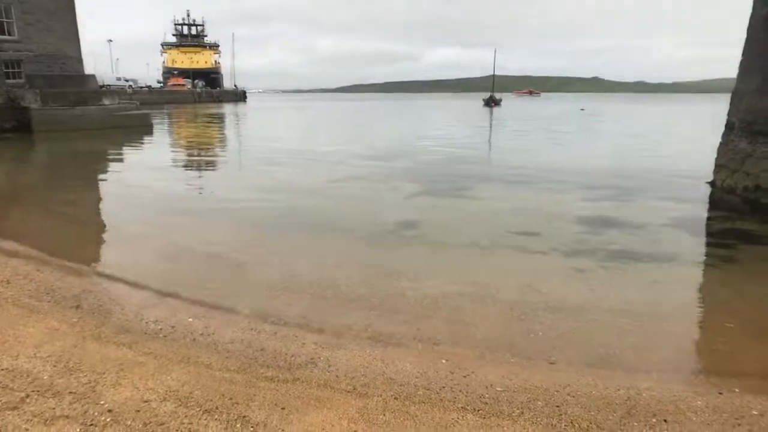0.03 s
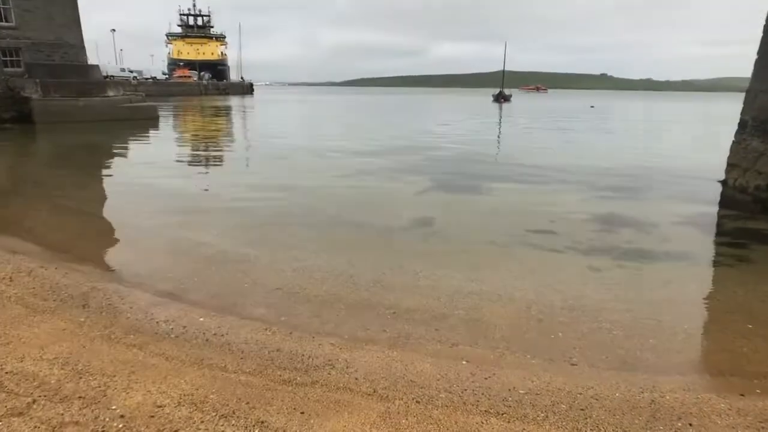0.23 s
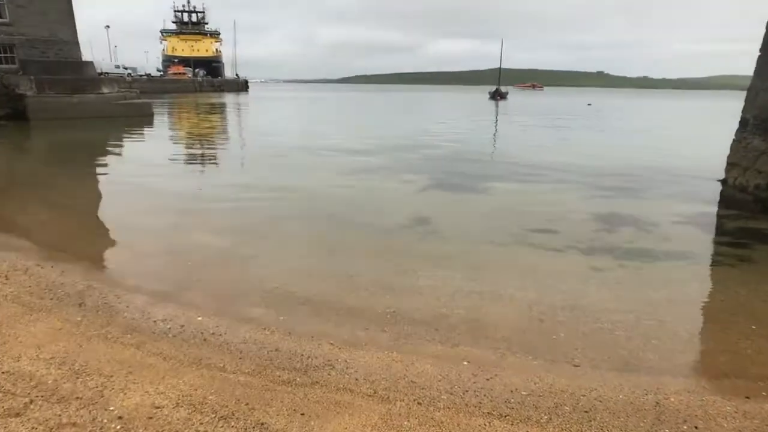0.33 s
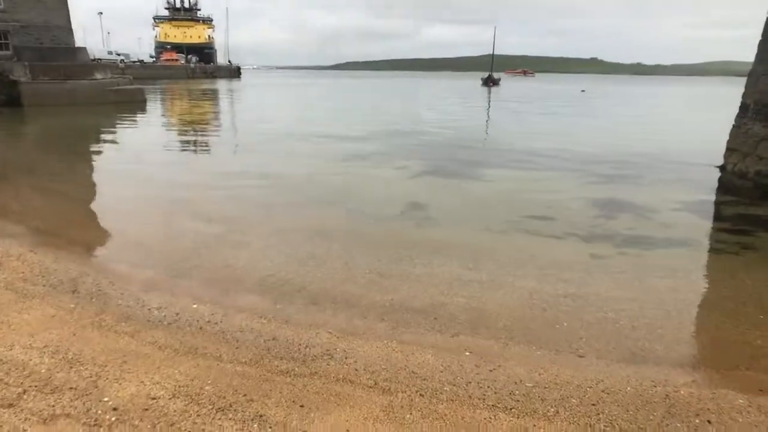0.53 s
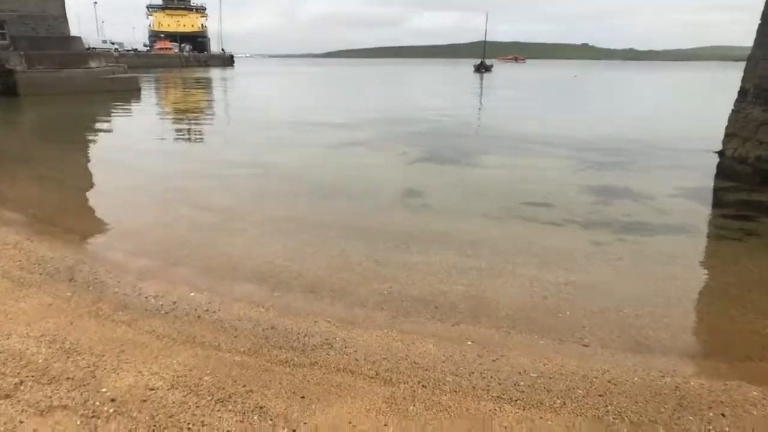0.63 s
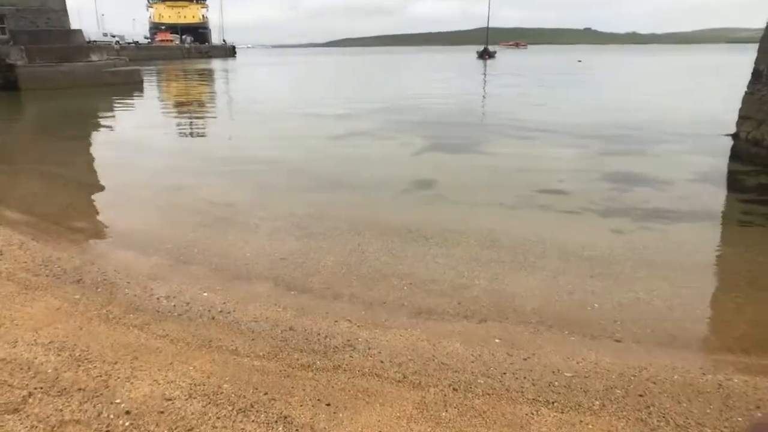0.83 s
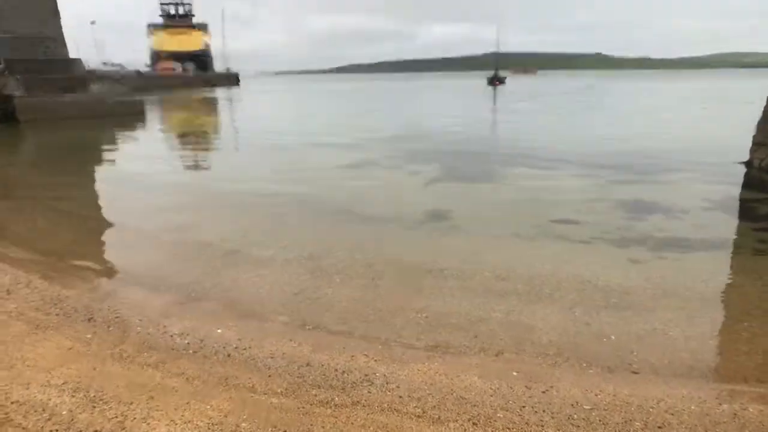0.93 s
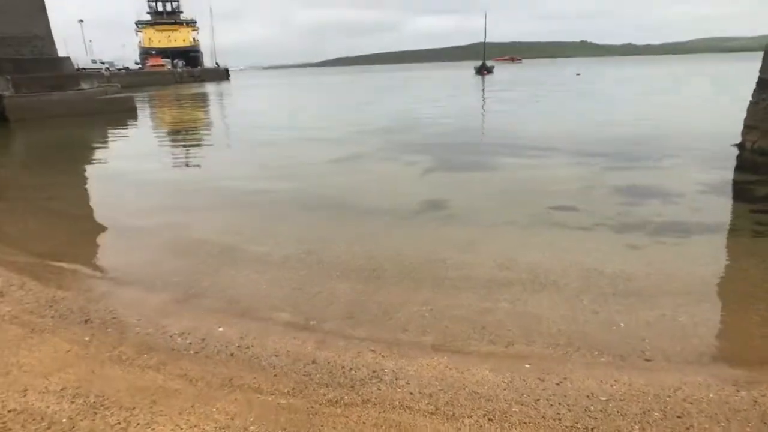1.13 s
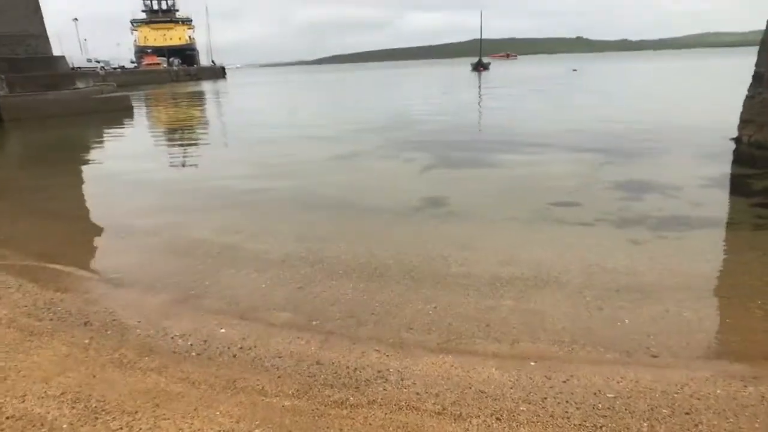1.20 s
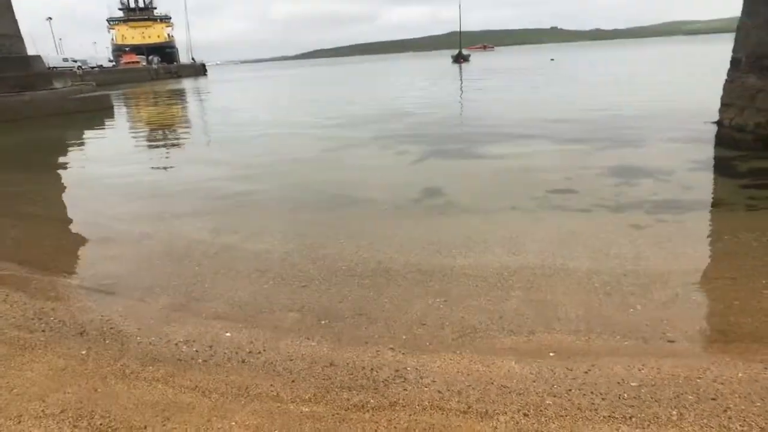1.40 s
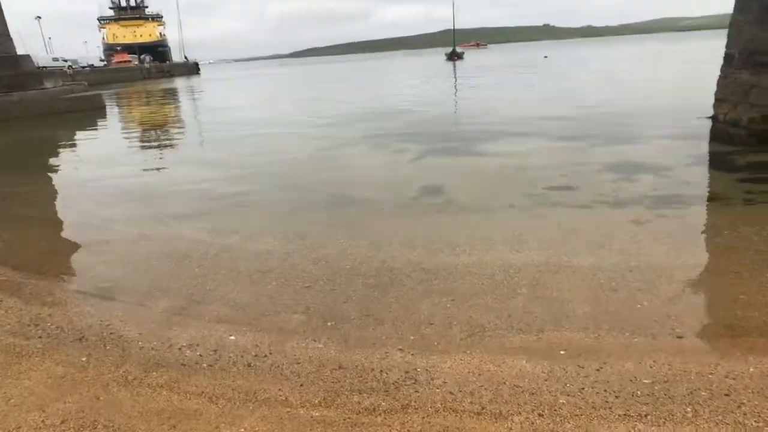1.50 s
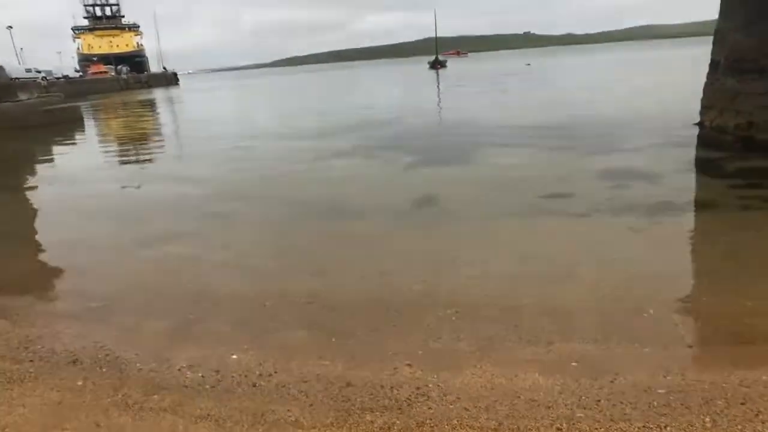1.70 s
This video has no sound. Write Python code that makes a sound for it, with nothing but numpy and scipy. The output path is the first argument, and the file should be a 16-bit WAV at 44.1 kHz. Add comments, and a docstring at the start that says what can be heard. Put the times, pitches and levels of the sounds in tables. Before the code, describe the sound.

Close handling noise on a microphone: irregular ticks and dull thumps, one loud knock, then a sharp click and a few lighter taps. Further off, water laps softly on a calm harbour beach under a faint, wavering engine-like hum.

```python
"""Fingers knock on the body of a hand-held microphone: each knock is a tick that drops into a thump.
One hard click, with a thin hiss swelling around it, leaves the casing ringing briefly; a hollow bump
of the hand follows. Behind lies a calm harbour beach: grit ticks, and a wavelet washes over coarse
sand and drains away, over open air and a low, wavering drone like a distant boat engine."""
import sys
import numpy as np
from scipy import signal
from scipy.fft import rfft, irfft
from scipy.io import wavfile

SR = 44100
rng = np.random.default_rng(int(sys.argv[2]) if len(sys.argv) > 2 else 0)


def file_out(sig):
    """Save sig as 16-bit WAV at sys.argv[1]."""
    # one column per channel
    cols = np.atleast_2d(sig).T
    # limit, then scale
    lim = np.clip(cols, -1, 1)
    pcm = np.round(lim * 32767).astype(np.int16)
    wavfile.write(sys.argv[1], SR, pcm)


N = 77175
TIME = np.arange(N) / SR

# Finger hits on the casing: (time [s], thump level [dB], sweep top [Hz], sweep bottom [Hz],
# tick level [dB], polarity [1 press, -1 release])
KNOCK_HITS = [(0.017, -35.5, 242, 68.4, -27, 1), (0.1755, -24.5, 407, 87, -25, 1),
              (0.2033, -23.5, 213, 82, -37, 1), (0.2279, -23, 336, 81.6, -46, 1),
              (0.2316, -25.5, 335, 83.4, -27, 1), (0.3183, -26.5, 333, 80, -41, 1),
              (0.4287, -22.5, 390, 93, -27, 1), (0.5731, -5, 2750, 162, -9, 1),
              (0.6665, -31.5, 800, 150, -25.5, 1), (0.7515, -12, 2380, 298, -18.5, 1),
              (0.7550, -15, 190, 91, -58, 1), (0.7884, -23.5, 1420, 303, -22, -1),
              (0.8950, -16.5, 656, 157, -59, -1), (0.9465, -15, 140, 96, -52, 1),
              (0.9798, -18, 263, 104, -38, -1), (1.0017, -10.5, 111, 102, -34, -1),
              (1.016, -20, 116, 69, -42, -1), (1.3498, -32.5, 900, 208, -28.5, -1),
              (1.3560, -27, 198, 78, -44, 1), (1.4652, -37.5, 710, 203, -39.5, 1)]
# The tick on each attack: (frequency [Hz], level [dB], 60 dB decay time [s])
TICK_MODES = [(1118, -1, 0.0037), (2220, 1.5, 0.0024), (3720, -0.5, 0.0022), (4720, -4.5, 0.00095),
              (9300, -30, 0.00076)]
# Tone of the scuff behind each tick: (frequency [Hz], level [dB])
SCUFF_EQ = [(400, 6), (1200, 10), (3800, -10.5), (5500, -25), (11000, -14.5), (16000, -25)]
def knocks():
    """Fingers tick, scuff and thump. The thump sweeps downward; a soft contact loses its top end."""
    sweep_cycles, first_crest_s = 0.848, 0.000434
    top_slope, bottom_slope = 4.96, 5.06
    scuff_vs_tick_db, scuff_decay_s = -13.5, 0.0044
    hits, scuff_envelope = np.zeros(N), np.zeros(N)
    for start, thump_db, top_hz, bottom_hz, tick_db, polarity in KNOCK_HITS:
        t = age(start) + 1e-7
        hz = sweep_cycles / t  # highs arrive first, lows last
        high_cut = 1 + (hz / top_hz) ** top_slope
        low_cut = 1 + (bottom_hz / hz) ** bottom_slope
        envelope = (hz < SR / 2) / np.sqrt(high_cut * low_cut)
        phase = 2 * np.pi * sweep_cycles * np.log(t / first_crest_s)
        thump = from_db(thump_db) * envelope * np.cos(phase)
        tick = from_db(tick_db) * struck(TICK_MODES, start)
        hits += polarity * (thump + tick)
        scuff_envelope += from_db(tick_db + scuff_vs_tick_db) * burst(start, scuff_decay_s)
    return hits + scuff_envelope * noise(SCUFF_EQ)


# The click's dry snap: (frequency [Hz], level [dB], 60 dB decay time [s])
SNAP_MODES = [(2280, 1, 0.0045), (3810, 0.5, .0018), (8600, -8, 0.0011), (12500, -15, 0.0039)]
# The casing's ringing tail: (frequency [Hz], level [dB], 60 dB decay time [s])
CASING_MODES = [(2194, 1, 0.17), (2295, -25, .15), (2740, -7, .17), (2700, 1, 0.16), (3100, 4, 0.18),
                (3180, -6, .19), (3450, -7, .21), (3500, -31, .16), (3694, 0, .25), (4000, -10, 0.14),
                (4470, -14, .2), (4270, -17, .17), (12330, 7.5, 0.044)]
# Tone of the casing's rattle: (frequency [Hz], level [dB])
RATTLE_EQ = [(500, 1), (1300, -7), (2300, -0.5), (4200, 2.5), (5500, -15), (9000, -15), (16000, -39)]
def hard_click():
    """A sharp snap, then the casing rings and rattles out."""
    start_s, rattle_attack_s, rattle_decay_s = 0.9796, 0.0067, 0.031
    snap = from_db(-9) * struck(SNAP_MODES, start_s)
    ring = from_db(-42) * struck(CASING_MODES, start_s)
    t = age(start_s)
    envelope = (1 - np.exp(-t / rattle_attack_s)) * np.exp(-t / rattle_decay_s)
    rattle = from_db(-30) * envelope * rub_gate() * noise(RATTLE_EQ)
    return snap + ring + rattle


def hand_bump(peak_s=1.013, width_s=0.0076, hz=126):
    """The hand bumps the casing after the click: a few cycles of a hollow low note."""
    return from_db(-14.5) * bell_curve(peak_s, width_s) * np.sin(-2 * np.pi * hz * (TIME - peak_s))


def thin_hiss(centre_hz=12450, width_hz=2700, peak_s=1, rise_s=0.047, fall_s=0.037):
    """A narrow band of high noise swells around the click and fades."""
    radius = np.exp(-np.pi * width_hz / SR)
    resonance = [1, -2 * radius * np.cos(2 * np.pi * centre_hz / SR), radius ** 2]
    hiss = signal.lfilter([1, 0, -1], resonance, rng.standard_normal(N))
    swell = np.exp(-np.maximum(peak_s - TIME, 0) / rise_s - age(peak_s) / fall_s)
    return from_db(-46.5) * swell * rub_gate() * rms_one(hiss)


# Ticks of grit: (time [s], level before the filter [dB])
GRIT_HITS = [(0.02, -36), (0.843, -45), (0.873, -46.5), (.955, -44.5), (1.264, -49)]
def grit(decay_s=0.0021, band_hz=(1180, 4700)):
    """Single grains of grit tick faintly, each a tiny burst of noise."""
    envelope = sum(from_db(db) * burst(start, decay_s) for start, db in GRIT_HITS)
    band = signal.butter(2, band_hz, "band", fs=SR, output="sos")
    return 2 * signal.sosfilt(band, envelope * rng.standard_normal(N))


# Fader moves of the wash: (time [s], fizz level [dB], water level [dB], foam level [dB])
WASH_FADERS = [(0, -53, -45, -66), (.12, -45, -42, -74), (.3, -47, -43, -63.5), (.53, -44.5, -42.5, -63),
               (.62, -51.5, -45, -65.5), (.69, -44, -45, -61), (.79, -44, -34.5, -71),
               (.825, -53, -46, -88), (.92, -56.5, -45, -75), (1.10, -55, -50, -67),
               (1.18, -63.5, -52, -70), (1.33, -63, -59.5, -70), (1.42, -58, -55, -65),
               (1.57, -60.5, -49, -65.5), (1.65, -65.5, -69, -70), (1.75, -64.5, -56, -71)]
# Bright fizz of the sand: (frequency [Hz], level [dB])
FIZZ_EQ = [(1000, -12), (1900, 1.5), (3300, 5), (4400, -3), (5600, -15.5), (7500, -20.5), (9600, -14),
           (12000, -24), (16000, -27)]
# Soft body of the water: (frequency [Hz], level [dB])
WATER_EQ = [(30, 14), (60, 4.5), (120, 9.5), (240, 11), (400, -2.5), (700, 2), (1150, 1.5), (1600, -0.5),
            (2600, -20.5), (6000, -41)]
# Airy top of the foam: (frequency [Hz], level [dB])
FOAM_EQ = [(4000, -20), (6500, -5.5), (9300, 7), (11000, 2), (13000, 1), (16000, -4)]
def wash(flutter_db=1.33):
    """Water runs over the sand: a soft body, a fizz of shifting grains and the hiss of fine foam."""
    fizz_gain, water_gain, foam_gain = [
        from_db(db + flutter_db * drift(rate_hz=26)) for db in automation(WASH_FADERS)]
    fizz = rms_one(noise(FIZZ_EQ) + from_db(-9) * grains(FIZZ_EQ, per_s=2500, spread_db=6))
    water = noise(WATER_EQ)
    foam = grains(FOAM_EQ, per_s=14000, spread_db=2)
    return fizz_gain * fizz + water_gain * water + foam_gain * foam


# Midrange tone of the bubbles: (frequency [Hz], level [dB])
BUBBLE_EQ = [(500, -36), (850, -1.5), (1100, 4), (1450, -3), (2200, -29), (6000, -50)]
def lap(peak_s=0.442, width_s=0.056):
    """A soft swell of small bubbles as the wavelet turns over."""
    return from_db(-42.5) * bell_curve(peak_s, width_s) * grains(BUBBLE_EQ, per_s=1100, spread_db=2)


# Pitch and fader moves of the drone: (time [s], pitch [Hz], level [dB])
DRONE_MOVES = [(0, 65, -41), (.05, 65, -42), (.14, 67, -50), (.22, 70, -43), (.3, 72, -47), (.4, 76, -39),
               (.53, 74, -42), (.64, 73, -41), (.75, 73, -39), (.86, 71, -39), (.92, 70, -45),
               (1.05, 67, -36), (1.32, 65.6, -35.5), (1.41, 62, -49), (1.47, 61, -47), (1.53, 61.2, -39),
               (1.75, 61.2, -38)]
# Harmonics of the drone: (multiple of the pitch, level [dB])
DRONE_HARMONICS = [(1, -0.5), (2, -23), (3, -19.5), (4, -23.5)]
def drone(waver_db=0.5):
    """A low hum with weak overtones wavers in pitch and level, like a distant boat engine."""
    hz, db = automation(DRONE_MOVES)
    phase = 2 * np.pi * np.cumsum(hz) / SR
    tone = sum(from_db(harmonic_db) * np.sin(k * phase) for k, harmonic_db in DRONE_HARMONICS)
    return np.sqrt(2) * from_db(db + waver_db * drift(rate_hz=5.7)) * tone


# Dark tone of the open air: (frequency [Hz], level [dB])
AIR_EQ = [(30, -24), (60, 11), (110, 9), (220, 1.5), (400, -7), (1500, -11.5), (3500, -50), (5500, -38),
          (7500, -39), (9000, -28.5), (11000, -58), (16000, -72)]
def open_air():
    """A steady bed of low noise under the beach."""
    return from_db(-47) * noise(AIR_EQ)


def from_db(db):
    """Decibels to gain."""
    return 10 ** (np.asarray(db) / 20)


def rms_one(x):
    """Scale to unit rms."""
    return x / np.sqrt(np.mean(x ** 2) + 1e-20)


def automation(rows):
    """Join timed breakpoints with straight lines, one curve per value column."""
    times, *columns = np.transpose(rows)
    return [np.interp(TIME, times, column) for column in columns]


def age(start):
    """Seconds since a moment, zero before it."""
    return np.maximum(TIME - start, 0)


def burst(start, decay_s):
    """An envelope that jumps up and dies away."""
    return (TIME > start) * np.exp(-age(start) / decay_s)


def bell_curve(peak_s, width_s):
    """An envelope that swells and fades symmetrically."""
    return np.exp(-0.5 * ((TIME - peak_s) / width_s) ** 2)


def rub_gate(end_s=1.064, release_s=0.0021):
    """Open until the rubbing stops, cutting rattle and hiss together."""
    return np.exp(-age(end_s) / release_s)


def drift(rate_hz):
    """A smooth random wobble with a spread of about 1."""
    hop, settle = 40, 2000
    pole = np.exp(-2 * np.pi * hop * rate_hz / SR)
    white = rng.standard_normal(N // hop + settle + 2)
    slow = signal.lfilter([1], [1, -2 * pole, pole ** 2], white)[settle:]
    return np.interp(np.arange(N) / hop, np.arange(len(slow)), rms_one(slow))


def colour(x, eq):
    """Shape a steady sound with an EQ curve; rms 1."""
    hz, db = np.transpose(eq)
    bin_hz = np.maximum(np.fft.rfftfreq(N, 1 / SR), 1)
    gain = from_db(np.interp(np.log(bin_hz), np.log(hz), db))
    return rms_one(irfft(rfft(x) * gain, N))


def noise(eq):
    """Coloured noise; rms 1."""
    return colour(rng.standard_normal(N), eq)


def grains(eq, per_s, spread_db):
    """Random pops, mostly small; rms 1."""
    sizes = from_db(spread_db * np.minimum(rng.exponential(1, N), 5))
    signs = rng.choice([-1, 1], N)
    triggers = rng.random(N) < per_s / SR
    return colour(sizes * signs * triggers, eq)


def struck(modes, start):
    """Damped sines that begin together, with alternating signs."""
    t = age(start)
    return sum((-1) ** k * from_db(db - 60 * t / t60) * np.sin(2 * np.pi * hz * t)
               for k, (hz, db, t60) in enumerate(modes))


def scene():
    """A mono mix: handling sounds up front, with shore, drone and open air behind."""
    foreground = knocks() + grit() + hard_click() + hand_bump() + thin_hiss()
    background = wash() + lap() + drone() + open_air()
    return (foreground + background)[None]


def record(dry):
    """Trim the deepest bass and cut the very top steeply."""
    low_cut = signal.butter(3, 30, "high", fs=SR, output="sos")
    high_cut = signal.ellip(10, 0.1, 80, 15800, fs=SR, output="sos")
    return signal.sosfilt(high_cut, signal.sosfilt(low_cut, dry))


dry = scene()
out = record(dry)
file_out(out)
```